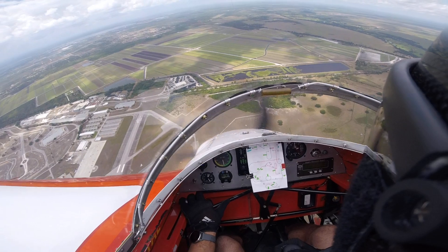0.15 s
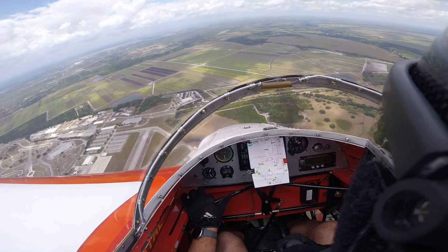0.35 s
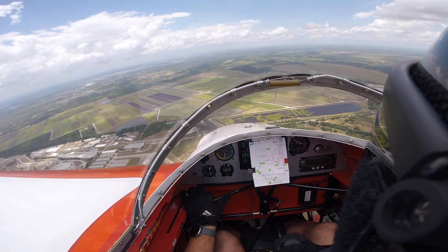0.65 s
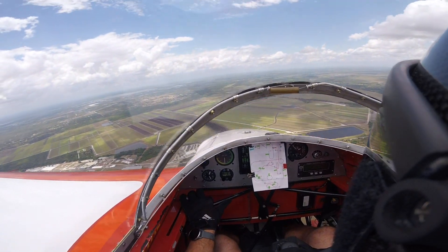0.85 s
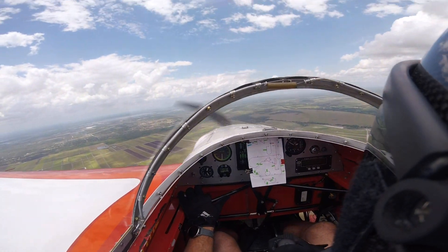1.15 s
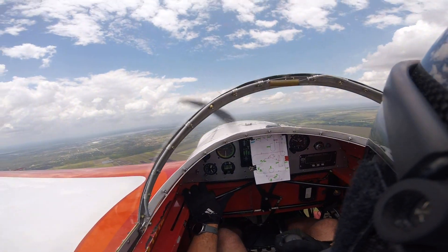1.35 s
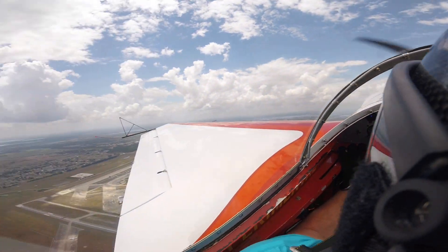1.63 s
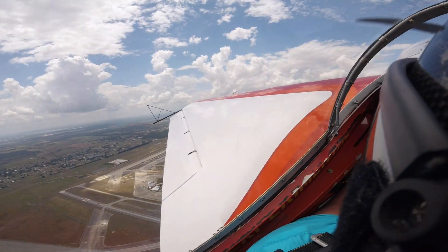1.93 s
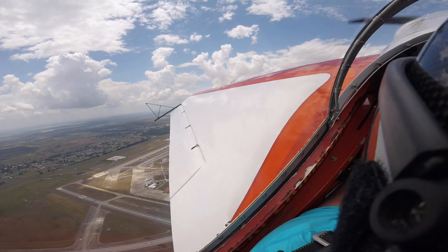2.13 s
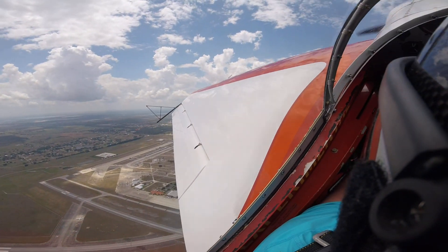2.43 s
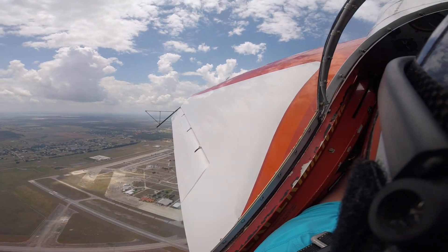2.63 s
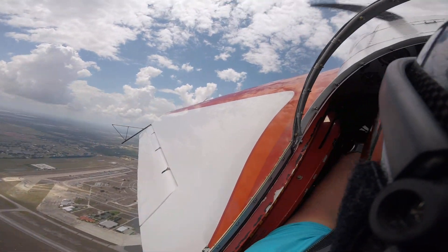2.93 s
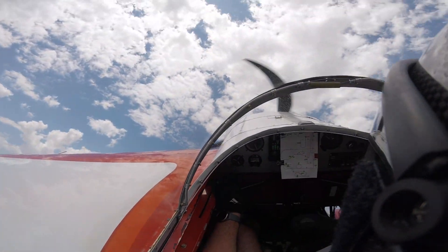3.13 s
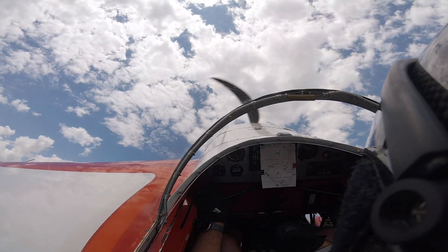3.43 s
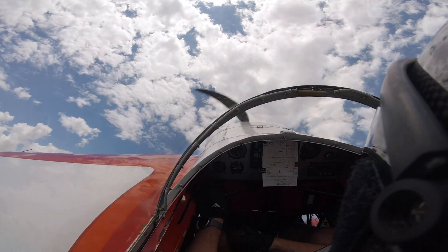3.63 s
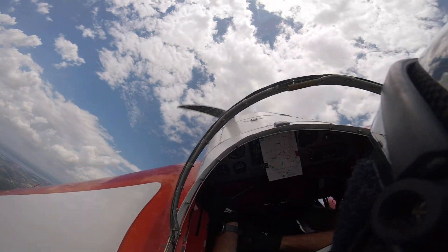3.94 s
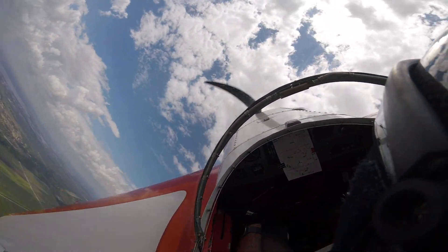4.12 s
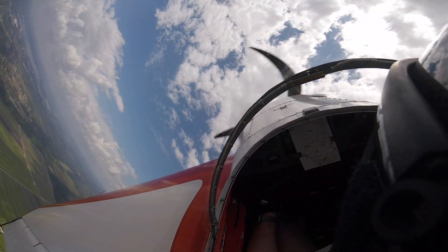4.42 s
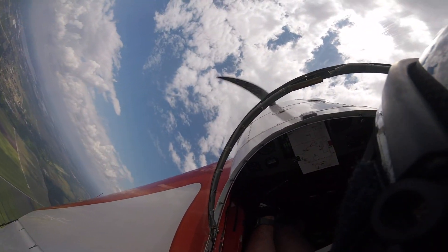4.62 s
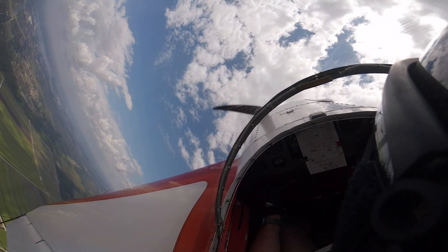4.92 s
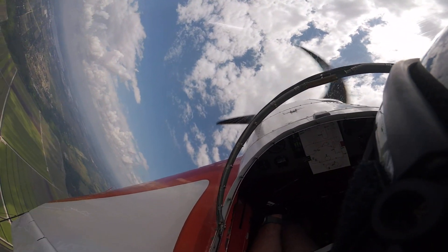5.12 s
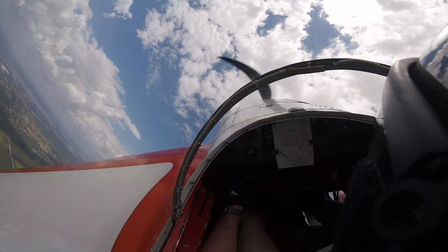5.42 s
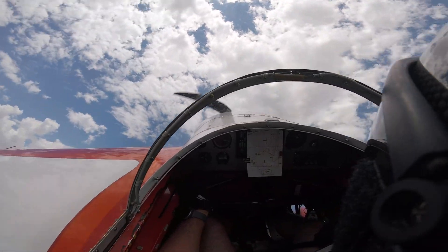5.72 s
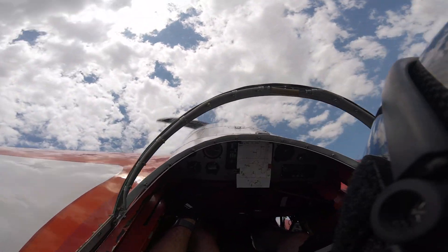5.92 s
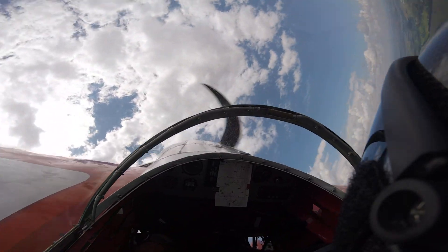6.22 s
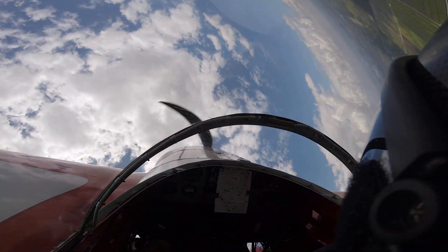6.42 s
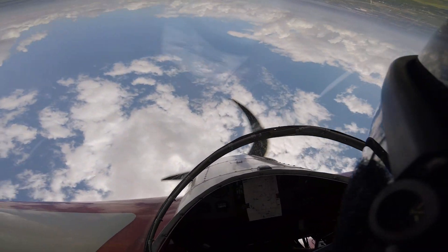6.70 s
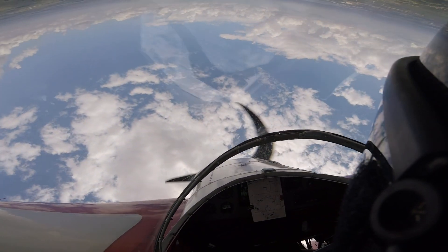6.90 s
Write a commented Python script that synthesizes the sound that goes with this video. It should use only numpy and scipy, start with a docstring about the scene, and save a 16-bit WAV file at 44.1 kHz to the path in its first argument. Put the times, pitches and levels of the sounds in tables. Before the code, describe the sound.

A small aerobatic plane at full power is heard from a microphone inside its closed cockpit, already loud at 0 s and never pausing. Propeller beats, about 89 per second, merge into a deep buzzing drone with strong low harmonics, over uneven exhaust rumble, a midrange roar and a dry rasp. From 0 to 1.3 s the slipstream is strongest, a broad howl and hiss with breathy whistles at the canopy. Between 1.3 and 3 s it falls away as the plane pulls up, and the pitch sags very slightly. Around 3 s the drone briefly dips and wavers. From 3 to 6 s the engine's grainy growl stands clearer, the roar swelling around 4.3 to 4.8 s, with thinner, higher hiss. Near 6 s roar and wind ease; from 6.4 s a hollow, airy midrange whistle and renewed rasp rise, the drone continuing to the abrupt end at 7 s.

```python
"""The drone of an aerobatic plane pulling up at full power, with the microphone inside its closed cockpit.
Propeller blades beat on the cabin about 89 times a second, heard as four harmonics of one low note.
The exhaust rumbles, roars and rasps: uneven cylinders give finer lines, with noise chopped by the beat.
Overhead the slipstream howls, hisses and whistles at the canopy, and short reflections comb it.
A look-ahead limiter eases the tallest peaks."""
import sys
import numpy as np
from scipy import signal
from scipy.fft import rfft, irfft, next_fast_len
from scipy.io import wavfile
from scipy.ndimage import uniform_filter1d, minimum_filter1d

SR = 44100
rng = np.random.default_rng(int(sys.argv[2]) if len(sys.argv) > 2 else 0)


def log_audio(samples):
    """Write samples as a 16-bit WAV file to the path given in sys.argv[1]."""
    # one column per channel
    frames = np.atleast_2d(samples).T
    # limit to full scale, then quantise
    limited = np.clip(frames, -1, 1)
    pcm = np.round(limited * 32767).astype(np.int16)
    wavfile.write(sys.argv[1], SR, pcm)


N = 311332
TIME = np.arange(N) / SR


def amp(db):
    """Decibels to gain."""
    return 10 ** (np.asarray(db) / 20)


def unit(x):
    """Scales to rms 1."""
    return x / np.sqrt(np.mean(x ** 2) + 1e-20)


def curve(rows):
    """A table of (time_s, value), read at every sample."""
    return np.interp(TIME, *np.transpose(rows))


def colour(x, points):
    """Filters x by a spectrum drawn on a log-frequency axis, then scales to rms 1."""
    hz, db = np.transpose(points)
    size = next_fast_len(N)
    bins = np.fft.rfftfreq(size, 1 / SR)
    gain = amp(np.interp(np.log(bins + 1), np.log(hz), db))
    return unit(irfft(rfft(x, size) * gain, size)[:N])


def band(x, hz, width_hz):
    """A steep-sided resonance of rms 1."""
    size = next_fast_len(len(x))
    detune = (np.fft.rfftfreq(size, 1 / SR) - hz) / (width_hz / 2)
    return unit(irfft(rfft(x, size) / (1 + detune ** 4), size)[:len(x)])


def wander(rate_hz):
    """A smooth random drift of rms about 1, up to about rate_hz."""
    frames = 4096
    span_s = 2 * N / SR  # twice the scene, so that the drift does not end where it began
    bins = np.arange(frames // 2 + 1) / span_s
    drift = irfft(rfft(rng.standard_normal(frames)) / (1 + (bins / rate_hz) ** 2))
    return np.interp(TIME, np.linspace(0, span_s, frames), unit(drift))


# engine speed, sagging under load: time_s, firing and blade-pass rate_hz
ENGINE_SPEED = [(0.0, 91.06), (0.5, 90.41), (0.95, 90.37), (1.73, 89.56), (1.85, 90.1), (1.93, 89.57),
                (2.8, 88.57), (3.08, 89.58), (3.66, 88.94), (3.8, 89.63), (4.04, 89.09), (4.26, 87.64),
                (5.13, 89.27), (5.39, 88.43), (5.83, 88.68), (6.44, 88.35), (6.74, 90.0), (7.06, 89.53)]


def engine_beats():
    """The running count of blade passes; one firing goes with each."""
    return np.cumsum(curve(ENGINE_SPEED)) / SR


# slipstream, dying away as the climb bleeds off speed: time_s, strength_db (0 is the usual slipstream)
SLIPSTREAM_STRENGTH = [(0.0, 8), (1.23, 8.5), (1.89, 3.5), (2.98, 0.8), (3.3, 0), (4.55, -1.1), (5.79, 0),
                       (6.11, -4), (7.06, -1.3)]


def slipstream():
    """The strength of the airflow over the plane, in dB re its usual strength."""
    return curve(SLIPSTREAM_STRENGTH)


# the drone's second harmonic: time_s, level_db before the trim
SECOND_HARMONIC = [(0.0, -14), (1.21, -12.5), (2.94, -15.5), (3.08, -25.5), (3.16, -15), (4.02, -14.5),
                   (4.12, -18), (4.42, -13.5), (4.63, -17.5), (5.75, -12), (5.93, -15.5), (7.06, -16.5)]
# the drone's third harmonic: time_s, level_db before the trim
THIRD_HARMONIC = [(0, -30), (.18, -20), (1.71, -18), (1.81, -22.5), (2.39, -20), (2.68, -33), (3.2, -16.5),
                  (3.34, -23), (4.12, -17.5), (4.34, -22), (4.79, -16.5), (6.1, -21), (7.06, -17)]


def drone(beats, slip_db, flutter=0.047, second_trim_db=1.0, third_trim_db=1.35):
    """Each blade pass is a dip of pressure; the cabin skews it, and gusts shake the upper harmonics most."""
    skew_rad = 0.5
    second_db = curve(SECOND_HARMONIC)
    swell_db = second_db - second_db.mean()
    # the even harmonics swell together at the cost of the fundamental, which deepens in slower air
    levels_db = [-11.5 - 0.21 * slip_db - 0.22 * swell_db,
                 second_db + second_trim_db,
                 curve(THIRD_HARMONIC) + third_trim_db,
                 -26 + 0.12 * slip_db + 0.4 * swell_db]
    out = np.zeros(N)
    for k, level_db in enumerate(levels_db, 1):
        shake = flutter * k / 2
        phase = 2 * np.pi * k * beats + skew_rad * (k - 1) ** 2 + shake * wander(14)
        swing = 1 + shake * wander(5.0)
        out -= np.sqrt(2) * amp(level_db) * swing * np.cos(phase)
    return out


def cylinders(beats, orders, level_db):
    """Unequal firings repeat every four beats and give fine lines, each swelling and fading on its own."""
    cycle = beats / 4
    unsteady, drift_hz = 0.33, 3
    out = np.zeros(N)
    for multiple, db in orders:
        phase = 2 * np.pi * (multiple * cycle + rng.random()) + unsteady * wander(drift_hz)
        swing = 1 + unsteady * wander(drift_hz)
        out += amp(db) * swing * np.cos(phase)
    return np.sqrt(2) * out * amp(level_db)


def air(beats, spectrum, level_db, beat, throb, gust_db):
    """Turbulence chopped by each blade pass, throbbing with the engine cycle and flickering in gusts."""
    slow_throb = np.cos(np.pi * beats) + np.cos(np.pi * beats / 2)  # every two and every four beats
    chop = 1 + beat * np.cos(2 * np.pi * beats) + throb * slow_throb
    turbulence = rng.standard_normal(N) * chop * amp(gust_db * wander(25))
    return amp(level_db) * colour(turbulence, spectrum)


# engine lines in the rumble: multiple of the four-stroke cycle, level_db
RUMBLE_LINES = [(2, -32), (5, -38.5), (6, -48), (7, -39), (9, -35.5), (10, -31.5), (11, -35.5), (13, -35.5),
                (14, -36), (17, -37.5), (18, -31.5), (19, -37.5), (20, -37)]
# engine lines in the roar: multiple of the four-stroke cycle, level_db re the trimmed roar plus clarity
ROAR_LINES = [(22, -15.5), (24, -17.5), (25, -14.5), (26, -13), (28, -16), (29, -17.5), (30, -12.5),
              (32, -21)]
# engine lines in the rasp: multiple of the four-stroke cycle, level_db re the trimmed rasp plus clarity
RASP_LINES = [(34, -11.5), (35, -19.5), (36, -11), (37, -13.5), (38, -12), (40, -19), (41, -28.5),
              (42, -15), (43, -20.5), (44, -20.5)]
# the exhaust's roar, around 600 Hz: time_s, level_db before the trim
ROAR_SWELL = [(0.0, -22.5), (2.05, -27), (2.82, -22), (3.08, -27), (3.62, -27), (4.26, -21.5),
              (4.71, -20.5), (5.95, -26), (6.72, -24.5), (7.06, -27.0)]
# the exhaust's rasp, around 900 Hz: time_s, level_db before the trim
RASP_SWELL = [(0.0, -23.5), (1.19, -23.0), (1.77, -26), (2.94, -26), (3.84, -23.6), (4.24, -26.3),
              (5.07, -25.0), (5.93, -28), (6.84, -22.5), (7.06, -23)]
# shape of the low buffeting noise: pitch_hz, relative density_db (per Hz)
BUFFET_SPECTRUM = [(15, -17.5), (30, -11), (50, -3.5), (70, -1.5), (130, 1.5), (200, 0.5), (260, 2.5),
                   (315, -4.5), (365, 1), (410, -2), (470, -10), (600, -18.5), (1000, -68.5)]
# shape of the roar's noise: pitch_hz, relative density_db (per Hz)
ROAR_SPECTRUM = [(300, -38), (420, -0.5), (480, 1), (600, 5.5), (690, 0), (745, -1.5), (800, -8.5),
                 (1000, -27), (2000, -61)]
# shape of the rasp's noise: pitch_hz, relative density_db (per Hz)
RASP_SPECTRUM = [(600, -38), (740, -5.5), (810, 3), (900, 1.5), (990, 0), (1070, -5), (1200, -8),
                 (1400, -15.5), (2500, -61)]


def engine(beats, slip_db, roar_trim_db=1.0, rasp_trim_db=-0.5):
    """The exhaust's comb of lines, with the noise of its puffs and the propeller wash between them."""
    roar_db = curve(ROAR_SWELL) + roar_trim_db
    rasp_db = curve(RASP_SWELL) + rasp_trim_db
    clarity_db = -0.2 - 0.65 * slip_db  # fast air blurs the cylinders' fine lines
    smear_db = -0.4 * clarity_db  # what the lines lose goes into noise
    lines = cylinders(beats, RUMBLE_LINES, 0)
    lines += cylinders(beats, ROAR_LINES, roar_db + clarity_db)
    lines += cylinders(beats, RASP_LINES, rasp_db + clarity_db)
    puffs = beats + 0.44  # the noise of each puff peaks a little under half a beat before the blade's dip
    beat, throb = 0.33, 0.04
    buffet = air(puffs, BUFFET_SPECTRUM, -19.5 + 0.41 * slip_db, beat=0.074, throb=0.078, gust_db=1.5)
    roar = air(puffs, ROAR_SPECTRUM, roar_db + smear_db - 6.5, beat, throb, gust_db=0.3)
    rasp = air(puffs, RASP_SPECTRUM, rasp_db + smear_db - 4.5, beat, throb, gust_db=0.5)
    return lines + buffet + roar + rasp


# shape of the slipstream's howl: pitch_hz, relative density_db (per Hz)
HOWL_SPECTRUM = [(900, -29), (1150, -10), (1290, -11), (1430, 0.5), (1700, -2), (1930, -1), (2150, -6.5),
                 (2500, -13), (3300, -29), (6000, -54)]
# shape of its rush: pitch_hz, relative density_db (per Hz)
RUSH_SPECTRUM = [(1500, -25), (2000, -5), (2250, 3), (2650, 1.5), (2900, -0.5), (3250, -4), (3700, -9),
                 (4300, -25), (7000, -30), (14000, -65)]
# shape of the lower hiss: pitch_hz, relative density_db (per Hz)
LOW_HISS_SPECTRUM = [(2000, -28), (3800, -12.5), (4700, -7), (5400, -0.5), (6300, -1.5), (7500, -9),
                     (10000, -12.5), (12000, -25.5), (15000, -43)]
# shape of the higher hiss: pitch_hz, relative density_db (per Hz)
HIGH_HISS_SPECTRUM = [(2500, -16), (3800, 2), (4700, 2), (5700, -8), (7200, 1), (8500, -1), (9700, -7),
                      (11000, -18.5), (12300, -33.5), (15000, -52)]


def canopy(beats, slip_db):
    """The slipstream howls, rushes and hisses at the seals, and whistles in the gaps."""
    out = air(beats, HOWL_SPECTRUM, -38.5 + slip_db, beat=0.13, throb=0.072, gust_db=0.6)
    out += air(beats, RUSH_SPECTRUM, -41 + 0.31 * slip_db, beat=0.078, throb=0.025, gust_db=0.65)
    # in slow air the hiss at the seals thins and rises: the lower hiss fades and the higher one grows
    out += air(beats, LOW_HISS_SPECTRUM, -51 + 0.63 * slip_db, beat=0.064, throb=0.039, gust_db=1.0)
    out += air(beats, HIGH_HISS_SPECTRUM, -48 - 0.6 * slip_db, beat=0.14, throb=0.05, gust_db=1.1)
    return out + whistles()


# airy whistles and gusts as air crosses gaps in the canopy:
# middle_s, length_s, pitch_hz, width_hz, level_db at the top of the arch
CANOPY_WHISTLES = [(0.796, 2.9, 883, 44.8, -37.5), (.8, 2.6, 1667, 112, -38), (1.0, 1.4, 2556, 200, -41.5),
                   (1.102, .76, 1790, 420, -32.5), (1.955, 1.32, 1204, 240, -33.5),
                   (2.1, 0.47, 2000, 219, -40), (2.144, .7, 2640, 450, -40), (2.88, 0.28, 1594, 600, -37),
                   (3.5, 1.1, 3160, 450, -46.5), (3.682, .45, 910, 80, -39), (4.7, 1.4, 2140, 1300, -40.5),
                   (5.7, .5, 2010, 171, -44), (6.382, 0.46, 4800, 750, -51), (6.801, 0.71, 828, 27.9, -32),
                   (6.822, 1.1, 1000, 61, -31.5)]


def whistles():
    """Each whistle is a narrow band of turbulence that swells and fades in one arch."""
    out = np.zeros(N)
    noises = rng.standard_normal((len(CANOPY_WHISTLES), N))
    for (middle_s, length_s, hz, width_hz, db), noise in zip(CANOPY_WHISTLES, noises):
        on = abs(TIME - middle_s) < length_s / 2
        arch = np.cos(np.pi * (TIME[on] - middle_s) / length_s)
        out[on] += amp(db) * arch * band(noise[on], hz, width_hz)
    return out


def glazing(x):
    """Short reflections under the canopy comb the air noise; the comb shifts as the airflow moves."""
    strength, drift_hz, dull_hz = 0.09, 0.35, 2400
    delays_s = rng.uniform(0.003, 0.016, size=12)
    echo = signal.lfilter(*signal.butter(2, dull_hz, fs=SR), x)  # the cockpit's padding soaks up the treble
    out = x.copy()
    for delay_s in delays_s:
        out += strength * wander(drift_hz) * np.roll(echo, round(delay_s * SR))
    return out * x.std() / out.std()  # the overall level stays as it was


def scene():
    """Drone, exhaust and slipstream all keep time with the engine and change colour as the plane slows."""
    beats, slip_db = engine_beats(), slipstream()
    mix = drone(beats, slip_db) + engine(beats, slip_db) + glazing(canopy(beats, slip_db))
    return mix[None]


def record(dry, knee_db=-3.5, squeeze=0.48, recover_db_per_s=120, makeup_db=-0.59):
    """A look-ahead limiter takes off part of each peak's excess and recovers quickly; then a treble cut."""
    edge_hz = 15000
    loud = dry * amp(makeup_db)
    level_db = 20 * np.log10(abs(loud[0]) + 1e-9)
    over_db = squeeze * np.maximum(level_db - knee_db, 0)
    fall_db = TIME * recover_db_per_s
    held_db = np.maximum.accumulate(over_db + fall_db) - fall_db
    # centred windows of 90 samples (2 ms) start each duck ahead of its peak
    duck_db = uniform_filter1d(minimum_filter1d(-held_db, size=90), size=90)
    lowpass = signal.firwin(511, edge_hz, window=("kaiser", 9), fs=SR)
    return signal.oaconvolve(loud * amp(duck_db), lowpass[None], "same")


dry = scene()
out = record(dry)
log_audio(out)
```